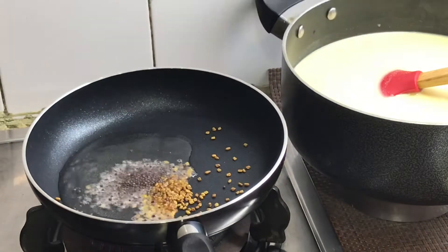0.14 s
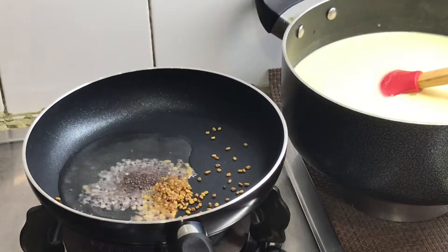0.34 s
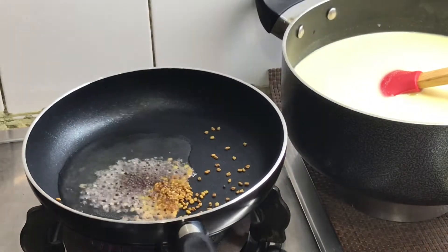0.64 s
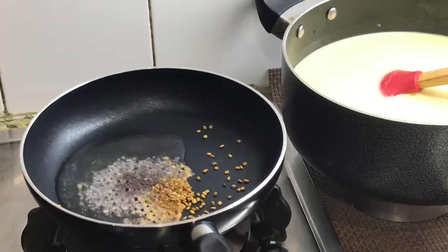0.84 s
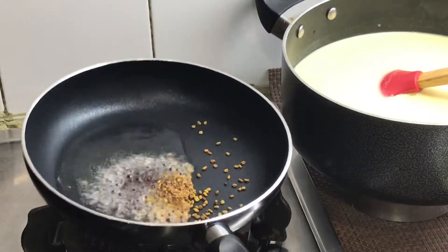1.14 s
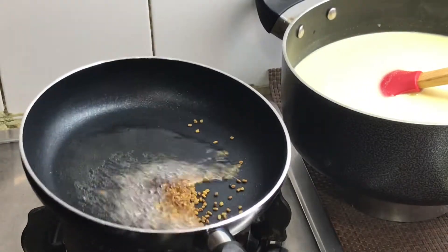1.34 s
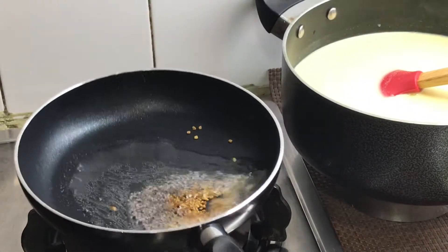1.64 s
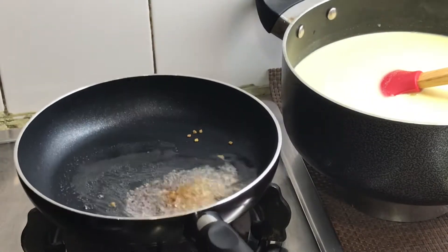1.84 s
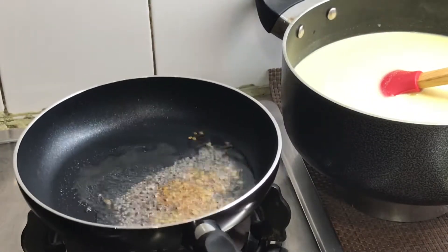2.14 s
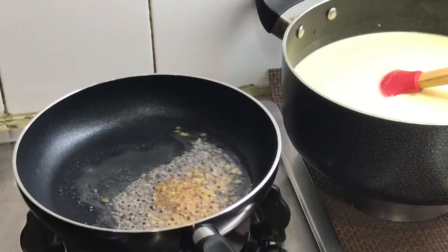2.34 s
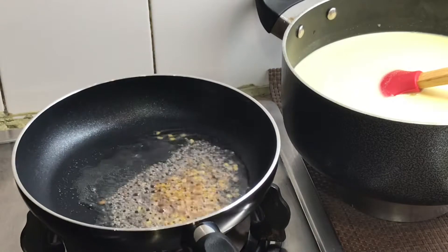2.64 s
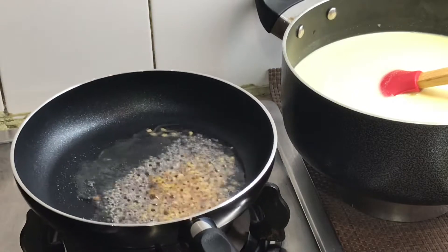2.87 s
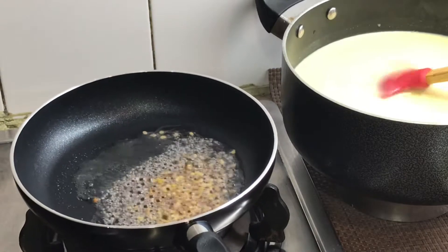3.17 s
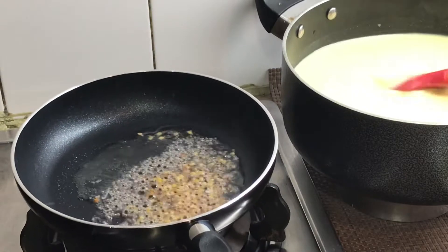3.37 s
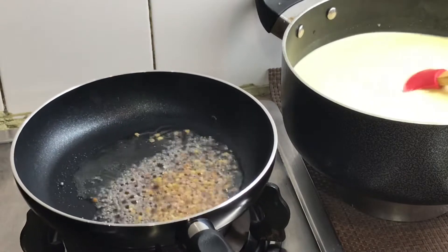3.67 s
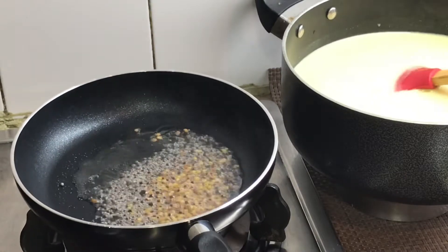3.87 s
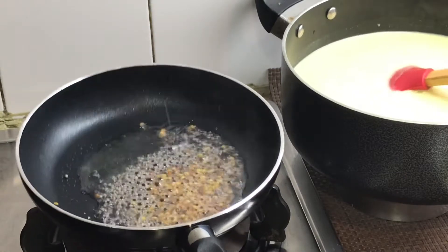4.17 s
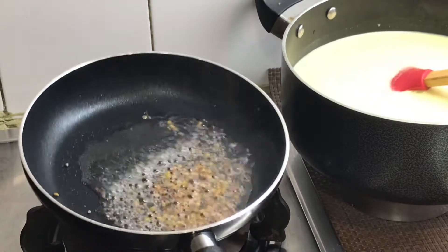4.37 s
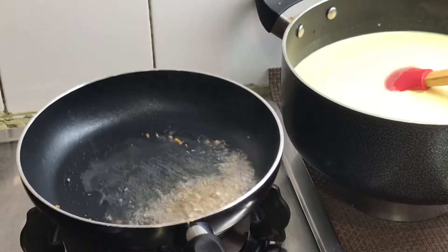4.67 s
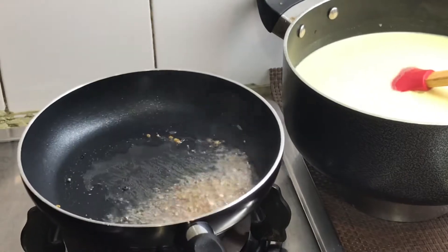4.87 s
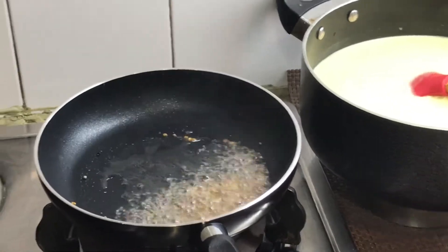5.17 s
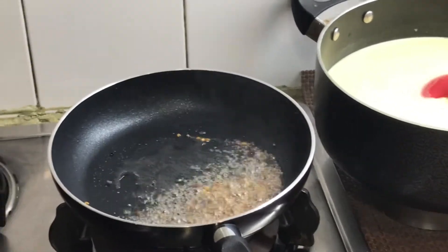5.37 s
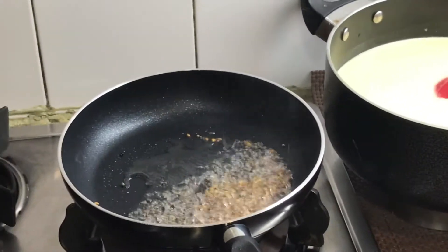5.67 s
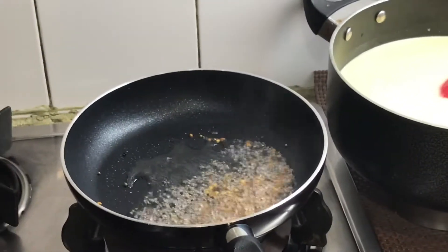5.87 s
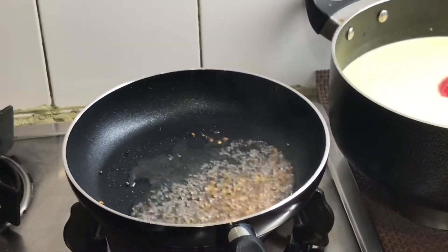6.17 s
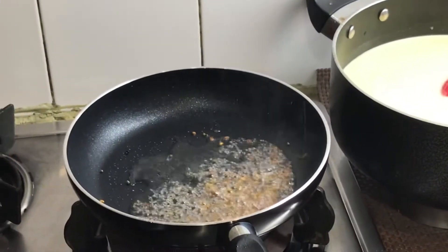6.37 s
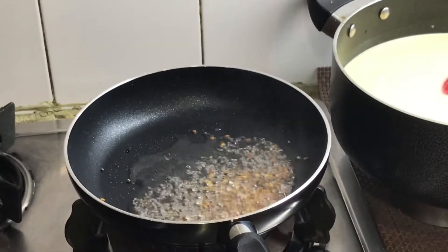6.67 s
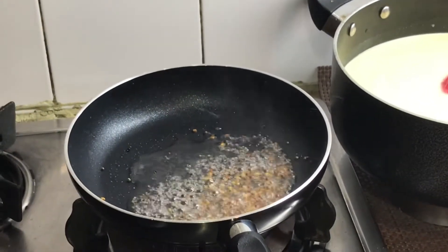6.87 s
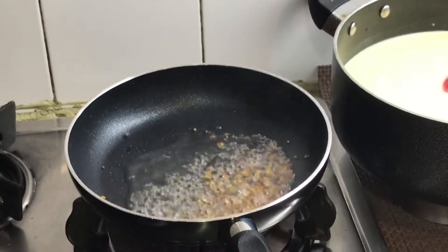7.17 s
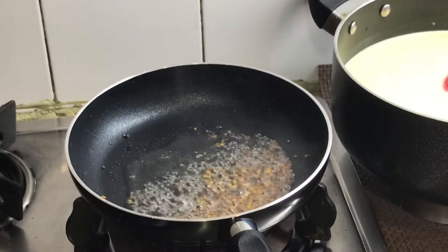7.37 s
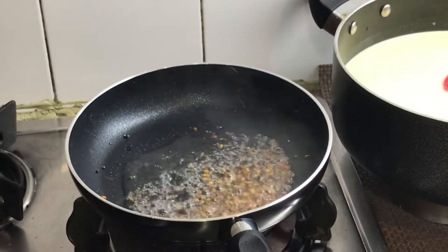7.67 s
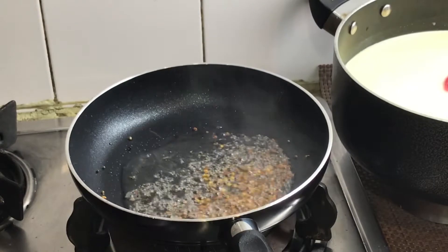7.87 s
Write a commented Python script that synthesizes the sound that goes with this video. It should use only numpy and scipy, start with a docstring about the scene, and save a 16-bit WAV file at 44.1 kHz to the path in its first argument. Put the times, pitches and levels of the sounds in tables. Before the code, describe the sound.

Seeds snap and crackle in sizzling oil, sparsely then in a dense sharp popping, with pan knocks and steel clinks over a low gas flame.

```python
"""Seeds frying in hot oil

Mustard and cumin seeds burst in a tiled kitchen, ever more often: each snap is a step and decaying noise
through one resonance. Random ticks form the sizzle and crackle; large bubbles and oil drops pop and tap at set
times above them. The swirled pan knocks on its grate and steel clinks and scrapes: rough contact noise and
decaying modes. A lid set down booms on the worktop, something rubs softly, and the gas burner rumbles: filtered
noise."""
import sys
import numpy as np
from scipy import signal
from scipy.fft import rfft, irfft, next_fast_len
from scipy.io import wavfile
from scipy.ndimage import map_coordinates

SR = 44100
rng = np.random.default_rng(int(sys.argv[2]) if len(sys.argv) > 2 else 0)


def unload_audio(sound):
    """Save the sound as a 16-bit wav file, at the path given as the first command line argument."""
    columns = np.transpose(np.atleast_2d(sound))
    # keep every value between -1 and 1, then stretch to whole-number steps
    steps = np.round(np.clip(columns, -1, 1) * 32767)
    wavfile.write(sys.argv[1], SR, steps.astype(np.int16))


N = 353196
TOP_HZ = 15900  # upper band limit
FLAME_DB = -45.5  # the gas flame burns evenly

# Levels are nominal: gains, scatter and filters named in the functions act on them.
# gas flame spectrum: frequency_hz, gain_db
FLAME_SPECTRUM = [(25, -34), (38, -4.5), (52, 2), (90, -0.5), (115, -2), (170, -5.5), (290, -4),
                  (460, -14.5), (650, -11), (1000, -8.5), (1500, -15), (3000, -27), (12000, -27)]
# growth of the frying: time_s, level_db
FRYING_LEVEL = [(0, -54), (2.4, -57.5), (3.2, -51.5), (4.0, -48), (4.9, -46), (6.2, -44), (8.0, -46)]
# foam spectrum: frequency_hz, gain_db
FOAM_SPECTRUM = [(400, -26), (1200, 5.5), (3000, 2), (6000, 9.5), (12000, 13.5), (15500, 6)]
# bands that the pan's bowl strengthens or cancels: frequency_hz, width_hz, gain_db
BOWL_BANDS = [(1806, 60, 7.5), (2867, 37, 6), (4166, 49, 4.5), (4840, 800, -5), (7720, 620, -4),
              (10520, 580, -7)]
# soft low rubbing: middle_s, half_length_s, level_db, pitch_hz
RUBBINGS = [(.22, 0.15, -45.5, 317), (3.416, 0.047, -47.5, 377)]
# loudest bursting seeds: start_s, level_db (over 10 ms)
LOUD_SEEDS = [ (0.0891, -28), (0.25, -33), (0.307, -33.5), (0.3785, -36.5), (0.746, -25), (0.9111, -27.5),
              (1.056, -34), (1.245, -34), (1.4245, -22.5), (1.439, -22.5), (1.6755, -30.5), (1.7336, -32.5),
              (1.8731, -32.5), (2.173, -28), (2.1864, -26), (2.45, -28.5), (2.4968, -29.5), (2.754, -34),
              (2.8439, -26), (2.8675, -26.5), (2.988, -33.5), (3.236, -24.5), (3.2572, -24.5),
              (3.3735, -33.5), (3.4496, -30), (3.5094, -26), (3.5848, -24.5), (3.6827, -25),
              (3.7519, -25.5), (3.815, -21.5), (4.0, -27), (4.0704, -23.5), (4.1114, -21.5), (4.225, -23.5),
              (4.2641, -18.5), (4.4074, -25.5), (4.478, -34.5), (4.5348, -28.5), (4.553, -24.5),
              (4.593, -23.5), (4.7576, -18), (4.9214, -20.5), (5.012, -24.5), (5.0365, -20.5),
              (5.1373, -26.5), (5.1539, -22), (5.2581, -23), (5.2854, -30), (5.4586, -21.5), (5.5278, -21),
              (5.6013, -22), (5.7199, -22), (5.754, -23.5), (5.7915, -20.5), (5.935, -16.5), (5.9826, -22),
              (6.0531, -24), (6.098, -29.5), (6.1478, -24), (6.268, -21.5), (6.2744, -22), (6.3389, -25),
              (6.3801, -23), (6.3842, -22), (6.5095, -26.5), (6.6321, -32.5), (6.6677, -27),
              (6.7386, -23.5), (6.7795, -18.5), (6.8427, -23.5), (6.8686, -22), (6.9074, -21.5),
              (7.018, -28.5), (7.047, -24), (7.1708, -22), (7.2373, -21.5), (7.3434, -29), (7.3873, -21.5),
              (7.4215, -27), (7.465, -17.5), (7.5, -23), (7.6, -23), (7.616, -21), (7.7828, -30),
              (7.803, -28.5), (7.8987, -22.5), (7.938, -26), (7.9829, -28)]
# the harder a seed bursts, the brighter its snap, up to a point: level_db, pitch_hz
SNAP_PITCH = [(-38, 4660), (-34.5, 5800), (-29, 9800), (-21.5, 9180)]
# snap spectrum: frequency_hz, gain_db
SNAP_SPECTRUM = [(300, -23), (900, -1.5), (1500, 1.5), (2200, 0), (3400, 0), (6200, -1.5), (9000, 0),
                 (12000, 0), (15500, 0)]
# largest oil bubbles, with a duller, pitched pop: start_s, level_db (over 10 ms)
LARGE_BUBBLES = [(0.4492, -35.5), (0.6185, -34.5), (1.038, -34.5), (1.069, -36), (2.2784, -36.5),
                 (3.6267, -30), (4.9528, -26), (5.195, -28.5), (6.1096, -31.5), (6.205, -34),
                 (6.3227, -32.5), (7.9208, -30.5)]
# things set down on the worktop: start_s, level_db
SET_DOWNS = [(0.707, -28.5), (0.799, -34.5), (7.938, -36.5), (7.975, -43)]
# worktop spectrum: frequency_hz, gain_db
WORKTOP_SPECTRUM = [(40, -25), (75, 0.5), (120, -12), (168, 6), (215, -3), (290, -5.5), (450, -16.5),
                    (1000, -17), (2500, -43)]
# steel on steel: start_s, level_db, pitch_hz, slide_s, ring_db
STEEL_CONTACTS = [(0.7072, -27, 3800, 0.0059, -1), (1.9635, -19, 3100, 0.018, -9.5),
                  (2.556, -21.5, 6150, 0.022, -5), (2.569, -20.5, 4100, 0.32, -7),
                  (2.626, -24.5, 7000, 0.027, -5.5), (2.675, -25.5, 9200, 0.19, -6)]
# modes of steel kitchenware: frequency_hz, level_db, t60_s
STEEL_MODES = [(2080, -6, 0.2), (2230, -2, 0.22), (2404, -7, .3), (2523, 0.5, 0.3), (3190, 1, 0.12),
               (3480, -5, 0.11), (3670, -6, 0.15), (4100, -3, 0.19), (4250, -1, 0.13), (4410, -0.5, 0.14),
               (4667, -9, 0.15), (4900, -12, .25), (5113, -1, 0.16), (5530, -1, 0.19), (6535, -9, .2),
               (7830, -0.5, 0.25), (8500, -1, .2), (9600, 3, .25), (12140, -5, .25), (13700, -1, .22),
               (13990, -1, .22)]
# pan touching the grate: start_s, level_db, stove_thud_db (relative to level_db)
GRATE_KNOCKS = [(1.376, -21.5, -17.5), (1.42, -37, -5), (1.664, -30.5, -8), (1.706, -26.5, -11),
                (2.033, -35.5, -12), (2.095, -30.5, -13), (2.156, -28.5, -11), (2.274, -37, -1.5),
                (3.542, -33.5, -4.5), (3.793, -42.5, -9), (4.642, -25.5, -15.5)]
# modes of the frying pan: frequency_hz, level_db, t60_s
PAN_MODES = [(598, -9.5, 0.18), (634.4, -7, 0.19), (970, -3.5, 0.15), (1012, 0, 0.33), (1067, -14, 0.34),
             (1340, -14, 0.14), (1573, 1, 0.029), (1787, -7, 0.077), (1863, -13, 0.22)]
# stove spectrum: frequency_hz, gain_db
STOVE_SPECTRUM = [(40, -24), (75, 6.5), (125, 0), (172, 2), (260, -1.5), (450, -14), (1600, -20),
                  (2600, -27), (6000, -31)]
# oil drops landing close by: start_s, level_db (over 10 ms)
OIL_DROPS = [(5.2585, -29.5), (6.7798, -36), (6.9088, -27)]
# oil drop spectrum: frequency_hz, gain_db
DROP_SPECTRUM = [(80, 3), (300, 7.5), (700, 8), (1700, 7), (3000, 4.5), (6000, -2), (15000, -34)]
# reverberation of the tiled kitchen: frequency_hz, t60_s
KITCHEN_DECAY = [(200, 1), (1500, 0.39), (5000, 0.32), (10000, 0.22), (15000, .28)]


def amp(db):
    """Level: decibels to amplitude ratio."""
    return 10 ** (np.asarray(db) / 20)


def unit(x):
    """Power normalisation: scale to rms 1."""
    return x / np.sqrt(np.mean(x ** 2) + 1e-20)


def burst(x):
    """Energy normalisation: scale a short sound to the energy of 10 ms at rms 1."""
    return x * np.sqrt(.01 * SR / (np.sum(x ** 2) + 1e-20))


def along(points, hz):
    """Logarithmic frequency: interpolate (Hz, value) points on a log axis."""
    f, v = np.transpose(points)
    return np.interp(np.log(hz + 1), np.log(f + 1), v)


def curve(rows):
    """Linear interpolation: read (s, value) rows at every sample."""
    return np.interp(np.arange(N) / SR, *np.transpose(rows))


def fade(t, t60):
    """Exponential decay: a fall of 60 dB in t60 seconds."""
    return np.exp(-np.log(1000) * t / t60)


def add(track, s, x):
    """Superposition: mix x into the track at time s."""
    i = int(np.clip(round(s * SR), 0, N - 1))
    track[i:i + len(x)] += x[:N - i]


def colour(x, points, peaks=(), size=16384):
    """Minimum phase: a causal filter with the given spectrum plus narrower peaks and notches."""
    f = np.fft.rfftfreq(size, 1 / SR)
    shape_db = along(points, f)
    for hz, width, db in peaks:
        shape_db = shape_db + db / (1 + (2 * (f - hz) / width) ** 2)
    # folding the cepstrum onto positive times makes the response causal
    cepstrum = irfft(np.log(amp(shape_db)))
    cepstrum[1:size // 2] *= 2
    cepstrum[size // 2 + 1:] = 0
    response = irfft(np.exp(rfft(cepstrum)))
    return signal.fftconvolve(x, response)[:len(x)]


def resonate(x, hz, q):
    """Resonance: a second-order band-pass centred on hz."""
    f = np.fft.rfftfreq(2 * len(x), 1 / SR)
    damping = 1j * f * hz / q
    return irfft(rfft(x, 2 * len(x)) * damping / (hz * hz - f * f + damping))[:len(x)]


def ring(modes, t, scatter_db):
    """Modal vibration: a sum of decaying sines, with new strengths and phases for every blow."""
    total = np.zeros(len(t))
    for hz, db, t60 in modes:
        strength = amp(db + scatter_db * rng.standard_normal())
        total += strength * fade(t, t60) * np.sin(2 * np.pi * (hz * t + rng.random()))
    return total


def kitchen(x, wet_db, direct=1, early=0.28, early_t60=0.019):
    """Reverberation: pan wall and tiles answer first, then the room decays, faster in the treble."""
    hz, t, z = signal.stft(rng.standard_normal(SR // 2), SR, nperseg=256)
    decaying = z * fade(t, along(KITCHEN_DECAY, hz)[:, None])
    tail = signal.istft(decaying, SR, nperseg=256)[1]
    t = np.arange(len(tail)) / SR
    tail = tail * (1 + early * fade(t, early_t60) * rng.exponential(size=len(t)))
    tail = tail * (1 - fade(t, 0.0019))  # the echoes build up after the direct sound
    response = amp(wet_db) * tail / np.linalg.norm(tail)
    response[0] = direct
    return signal.fftconvolve(x, response)


def burner():
    """Turbulent combustion: the steady low rush of the gas flame is filtered noise."""
    noise = rng.standard_normal(N + SR)
    return amp(FLAME_DB) * unit(colour(noise, FLAME_SPECTRUM)[SR:])  # drop the filter's build-up


def sizzle(rate=1800, gain_db=0.5):
    """Shot noise: countless tiny ticks of the foam, rate per second, merge into a hiss."""
    ticks = (rng.random(N) < rate / SR) * rng.standard_normal(N)
    hiss = unit(kitchen(colour(ticks, FOAM_SPECTRUM, BOWL_BANDS), wet_db=-13)[:N])
    return amp(curve(FRYING_LEVEL) + gain_db) * hiss


def snap(hz, steam=1, cycles=36, q_low=4, q_mid=1.0, q_high=0.9, step=2.4):
    """Impulsive excitation: a husk splits with a step and a spurt of steam; low pitches ring longer."""
    t = np.arange(512) / SR
    crack = steam * rng.standard_normal(len(t)) * fade(t, cycles / hz)
    crack[0] = step
    cutoff_hz = min(2 * hz, SR / 2 - 1000)
    crack = signal.lfilter(*signal.butter(2, cutoff_hz, fs=SR), crack)
    q = along([(3500, q_low), (6000, q_mid), (10500, q_high)], hz)
    return burst(resonate(crack, hz, q))


def crackle(rate=26, gain_db=3, spread_db=4, count=600):
    """Random events: small bubbles, about rate per second, louder and brighter as the frying grows."""
    out, frying_db = np.zeros(N), curve(FRYING_LEVEL)
    draws = np.c_[rng.random((count, 2)), rng.standard_normal((count, 2))]
    for when, chance, size, pitch in draws:
        if chance >= rate * N / SR / count:
            continue
        db = frying_db[int(when * N)]
        hz = np.interp(db, [-54, -49], [4000, 7000]) * np.exp(.35 * pitch)
        tick = snap(np.clip(hz, 2000, 14000))
        add(out, when * N / SR, amp(db + gain_db + spread_db * min(size, 2)) * tick)
    return kitchen(colour(out, SNAP_SPECTRUM, BOWL_BANDS), wet_db=1.0)[:N]


def rubs():
    """Friction noise: something rubs softly, a low, narrow rush that swells and fades."""
    out, t = np.zeros(N), np.arange(N) / SR
    for middle, half, db, hz in RUBBINGS:
        rush = resonate(resonate(rng.standard_normal(N), hz, 2.9), hz, 2.9)
        out += amp(db) * np.exp(-((t - middle) / half) ** 2) * unit(rush)
    return out


def pitch_of(db, scatter=0.042):
    """Level-dependent spectrum: the pitch of a seed's snap follows its strength."""
    return np.interp(db, *np.transpose(SNAP_PITCH)) * np.exp(scatter * rng.standard_normal())


def bursts(follow_share=.5, follow_s=.022, follow_db=-10, stray_rate=7, stray_db=12.5,
           scatter_db=2, count=100):
    """Triggered and random events: loud seeds, neighbours they set off, and strays as (s, dB)."""
    frying_db = curve(FRYING_LEVEL)
    neighbours, strays = [], []
    for (s, db), (chance, lag) in zip(LOUD_SEEDS, rng.random((len(LOUD_SEEDS), 2))):
        if chance < follow_share:
            neighbours.append((s + follow_s * (.5 + lag), db + follow_db))
    # strays, about stray_rate per second, go off as hard as the oil fries
    for k, (chance, lag, size) in enumerate(rng.random((count, 3))):
        if chance < stray_rate * N / SR / count:
            db = frying_db[k * N // count] + stray_db + scatter_db * (2 * size - 1)
            strays.append(((k + lag) / count * N / SR, db))
    return list(LOUD_SEEDS) + neighbours + strays


def seeds(wet_db=-3, nearness=0.059, rebound_db=-13):
    """Direct and diffuse sound: each seed has its own echo, and its flying husk ticks on the pan."""
    out = np.zeros(N)
    for s, db in bursts():
        hz = pitch_of(db)
        # the loudest seeds burst nearest the listener, so they stand further above their echo
        direct_db = db + nearness * max(db + 27, 0)
        add(out, s, amp(direct_db) * snap(hz))
        # the room gathers the snap from all directions, which evens out its colour
        add(out, s, amp(db) * kitchen(snap(hz, steam=0.49), wet_db, direct=0))
        husk_db = db + rebound_db + 3.3 * rng.standard_normal()
        add(out, s + rng.uniform(.002, .008), amp(husk_db) * snap(hz))
    return colour(out, SNAP_SPECTRUM, BOWL_BANDS)


def bubbles(hz=4300, scatter=0.037, q=1.6, wet_db=-3):
    """Bubble resonance: large bubbles all pop near one pitch."""
    out = np.zeros(N)
    for s, db in LARGE_BUBBLES:
        pop = snap(hz * np.exp(scatter * rng.standard_normal()), q_low=q)
        add(out, s, amp(db) * kitchen(pop, wet_db))
    return colour(out, SNAP_SPECTRUM, BOWL_BANDS)


def counter(gain_db=7):
    """Forced plate response: the worktop booms under a lid or pot as decaying, filtered noise."""
    out, t = np.zeros(N), np.arange(SR // 2) / SR
    for s, db in SET_DOWNS:
        boom = colour(rng.standard_normal(len(t)) * fade(t, 0.68), WORKTOP_SPECTRUM)
        add(out, s, amp(db + gain_db) * burst(boom))
    return out


def steel(contact_db=-1, rolloff_db=9, slip_db=7):
    """Stick-slip friction: rough steel contact catches and slips, and sets the modes ringing."""
    out, t = np.zeros(N), np.arange(SR // 2) / SR
    for s, db, hz, slide, ring_db in STEEL_CONTACTS:
        # the grip wanders between random values, 220 per second
        wander = map_coordinates(rng.standard_normal(256), [t * 220], mode="nearest")
        grip = amp(slip_db * np.tanh(wander))
        envelope = fade(t, 2 * slide) * fade(np.maximum(t - .5 * slide, 0), slide)
        contact = rng.standard_normal(len(t)) * grip * envelope
        # the first touch is one hard blow; the modes nearest the contact's pitch wake most
        push = np.r_[14, contact]
        modes = [(f, level - rolloff_db * np.log2(f / hz) ** 2, t60) for f, level, t60 in STEEL_MODES]
        rung = signal.fftconvolve(push, ring(modes, t, scatter_db=0.5))[:len(t)]
        # crowded, quickly damped modes give the rasp its broad bands
        rasp = colour(contact, [(700, -16), (1600, 8), (8500, 5.5), (11000, 1.0)],
                      [(2320, 920, 6.0), (3740, 710, -5.5), (4470, 150, 12.5), (5550, 530, 8.0)])
        clink = amp(ring_db) * burst(rung) + amp(contact_db) * burst(resonate(rasp, hz, 0.78))
        add(out, s, amp(db) * kitchen(clink, wet_db=-3))
    return out


def pan(ring_db=-3.0, clack_db=-5, thud_db=6):
    """Impact of coupled bodies: the swirled pan chatters and rings on the grate; the stove thuds."""
    out, t = np.zeros(N), np.arange(SR // 2) / SR
    clack_spectrum = [(150, -1), (600, -1.5), (1000, 21.5), (1750, 7.0), (2300, -0.5), (5000, -15)]
    for s, db, stove_db in GRATE_KNOCKS:
        chatter = rng.standard_normal(len(t)) * rng.exponential(size=len(t)) * fade(t, 0.096)
        clack = colour(chatter, clack_spectrum)
        thud = colour(rng.standard_normal(len(t)) * fade(t, 0.51), STOVE_SPECTRUM)
        knock = amp(ring_db) * burst(ring(PAN_MODES, t, scatter_db=1.5))
        knock = knock + amp(clack_db) * burst(clack) + amp(stove_db + thud_db) * burst(thud)
        add(out, s, amp(db) * kitchen(knock, wet_db=-8.0))
    return out


def spatter():
    """Near-field impact: flying drops tap close by, full and almost without echo."""
    out, t = np.zeros(N), np.arange(2048) / SR
    for s, db in OIL_DROPS:
        tap = fade(t, 0.00024) + 0.0091 * rng.standard_normal(len(t)) * fade(t, 0.005)
        add(out, s, amp(db) * kitchen(burst(colour(tap, DROP_SPECTRUM)), wet_db=-21))
    return out


def scene():
    """Superposition: everything on and around the stove, in one channel."""
    frying = sizzle() + crackle() + seeds() + bubbles() + spatter()
    utensils = counter() + steel() + pan()
    return (burner() + rubs() + frying + utensils)[None]


def record(dry):
    """Saturation and band limiting: peaks round off near full scale, and nothing passes TOP_HZ."""
    held = dry / (1 + np.abs(dry) ** 6) ** (1 / 6)
    size = next_fast_len(N + SR // 2)
    passed = np.fft.rfftfreq(size, 1 / SR) < TOP_HZ
    return irfft(rfft(held, size) * passed, size)[..., :N]


dry = scene()
out = record(dry)
unload_audio(out)
```